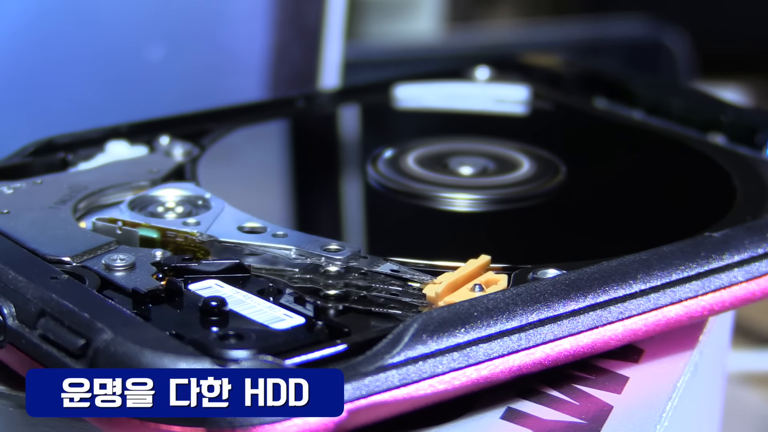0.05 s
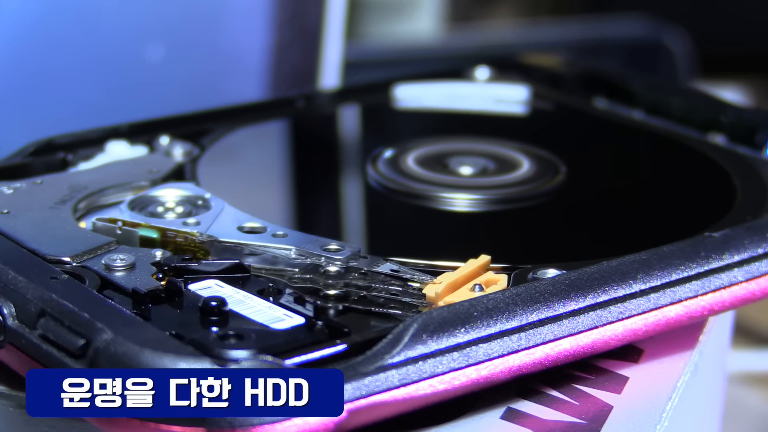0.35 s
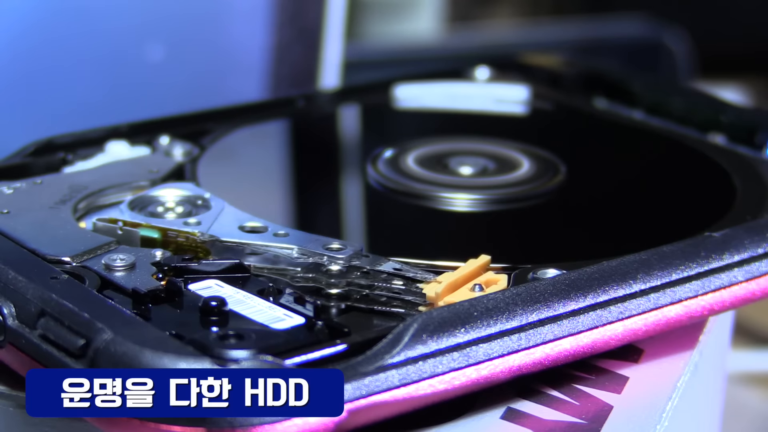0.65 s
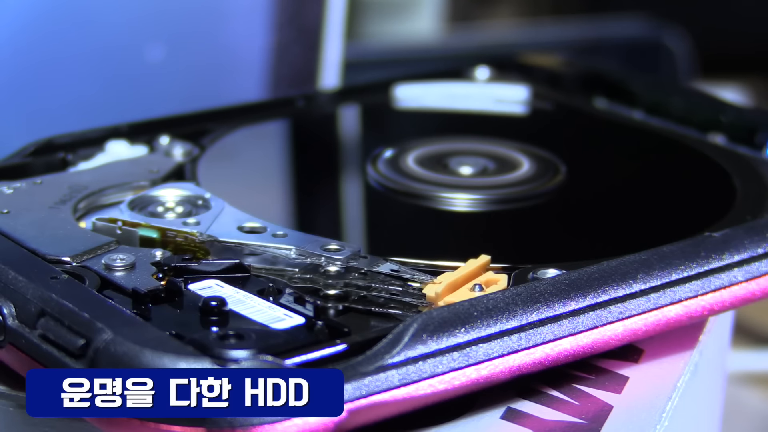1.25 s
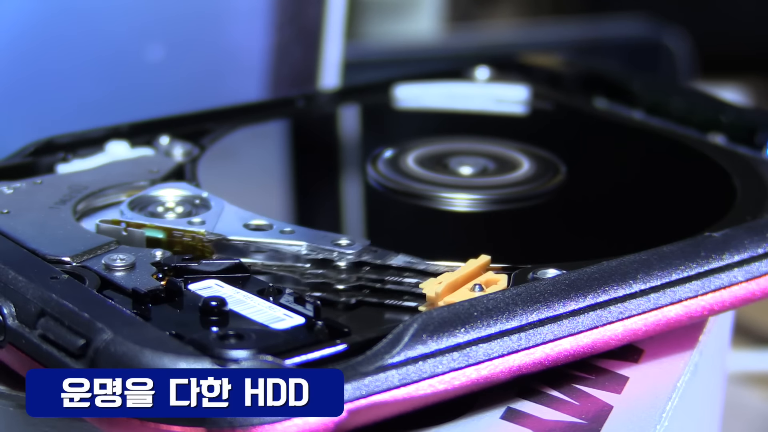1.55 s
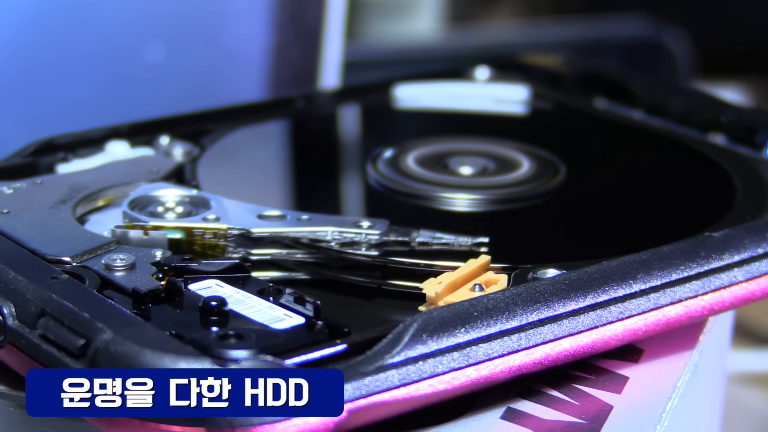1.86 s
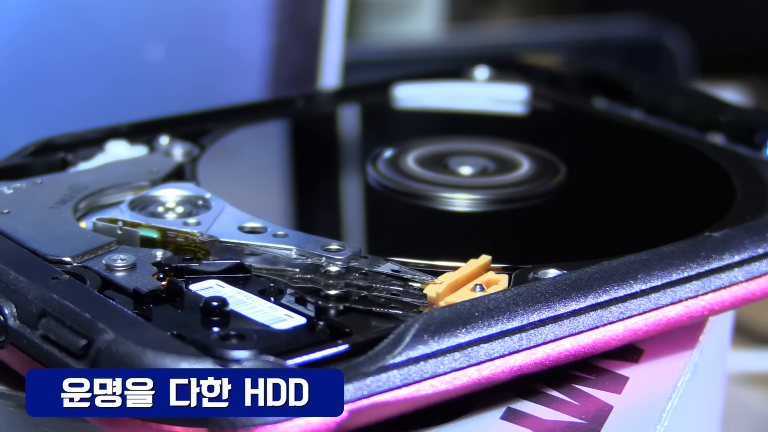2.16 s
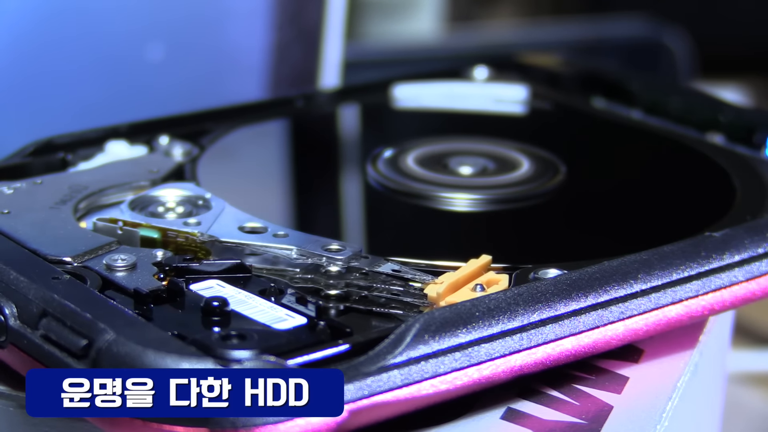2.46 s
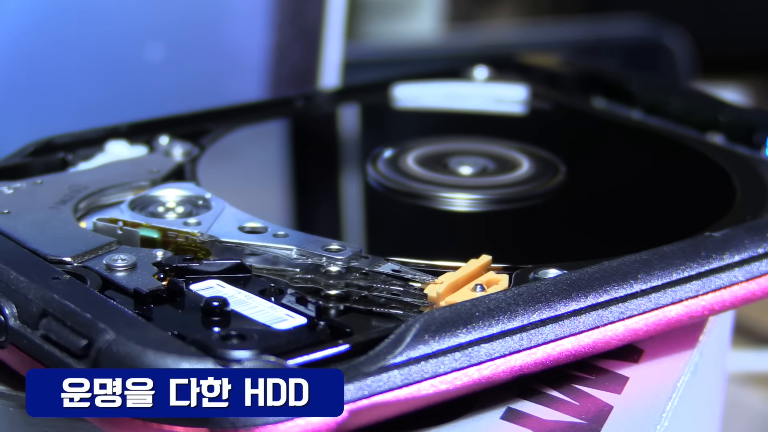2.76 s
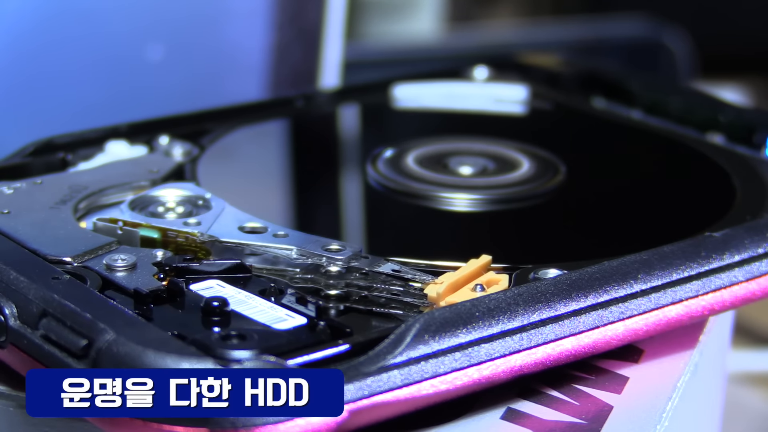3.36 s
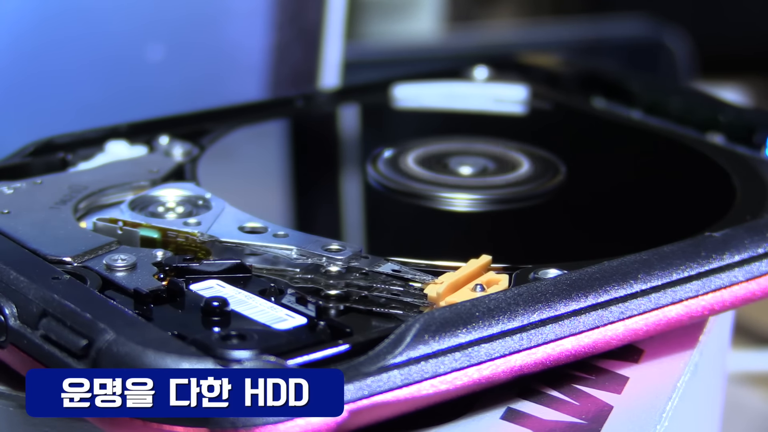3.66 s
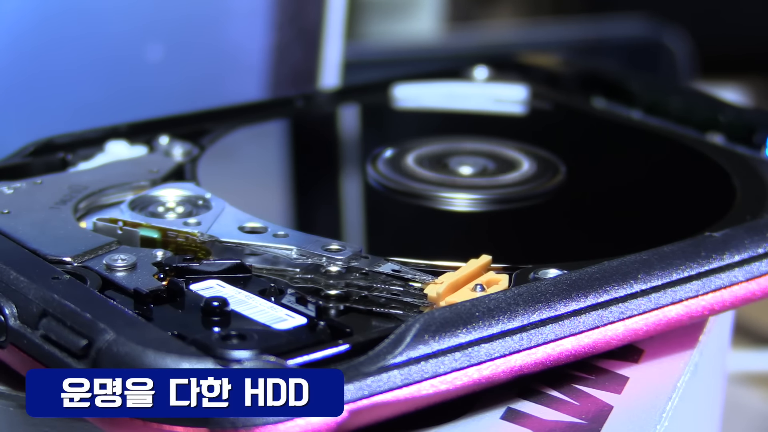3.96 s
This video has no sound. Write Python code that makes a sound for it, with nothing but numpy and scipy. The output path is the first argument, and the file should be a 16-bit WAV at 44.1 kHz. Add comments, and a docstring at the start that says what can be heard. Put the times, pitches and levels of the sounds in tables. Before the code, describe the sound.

A failing hard drive rubs with a high hiss, clacks three times, then winds down.

```python
"""Failing hard drive, opened

Close up, the heads rub on the spinning platter and the arm clacks three times against its stop.
The motor cuts out: the rubbing dulls and fades, and at low speed the heads catch on the same
rough spots at every turn. Thin squeaks and casing bumps lie over a quiet room with mains hum."""
import sys
import numpy as np
from scipy import signal
from scipy.fft import rfft, irfft
from scipy.io import wavfile

SR = 44100
rng = np.random.default_rng(int(sys.argv[2]) if len(sys.argv) > 2 else 0)


def wrap_up_sound(samples):
    """Save the sound to the file named by the first command line argument, as 16-bit audio."""
    columns = np.atleast_2d(samples).T
    # keep every value between -1 and 1, then stretch to whole-number steps
    tamed = np.clip(columns, -1, 1)
    steps = np.round(tamed * 32767).astype(np.int16)
    wavfile.write(sys.argv[1], SR, steps)


N = 176400
T = np.arange(N) / SR

# Platter speed. Each row: time in seconds, turns per second.
PLATTER_SPEED = [(0, 115.5), (2.2, 113.3), (2.45, 98), (2.75, 90), (2.87, 83), (3.16, 61.5), (3.35, 53),
                 (3.8, 43), (4, 29)]
# Head friction. Each row: time in seconds, force in dB.
RUB_FORCE = [(0, -27.5), (.52, -28), (.83, -25.5), (.95, -30), (1.19, -29.5), (1.32, -27.5), (1.7, -27),
             (1.84, -31.5), (2.05, -30), (2.075, -24.5), (2.28, -27), (2.55, -32.5), (2.84, -39),
             (3.06, -45.5), (3.28, -53.5), (3.48, -64), (4, -79)]
# Arm and platter under rubbing. Each row: centre in Hz, width in Hz, relative density in dB.
RUB_BANDS = [(465, 410, -24), (1134, 960, -22.5), (1890, 510, -9.5), (2277, 496, -6.5), (3120, 700, -12),
             (3576, 420, -4), (3815, 240, 0.5), (4170, 400, -2.5), (4515, 354, -0.5), (4935, 460, -5),
             (5586, 750, -11.5), (6550, 320, -9), (6960, 480, -12), (8030, 2000, -20), (10140, 1200, -19.5),
             (11760, 750, -20), (13200, 2000, -31.5), (15300, 900, -34.5)]
# Hum of the unbalanced platter. Each row: time in seconds, level in dB.
UNBALANCE_LEVEL = [(0, -55.5), (2.2, -56), (2.62, -55), (2.84, -42.5), (3.1, -45.5), (3.27, -43.5),
                   (3.36, -55.5), (4, -64)]
# Arm skids. Each row: start in seconds, length in seconds, force in dB, softness 0-1, rise in seconds.
ARM_SKIDS = [(.0082, 0.011, -18, 0, .001), (1.245, 0.0081, -11.5, 0.22, .002),
             (2.0794, 0.0083, -15, 0.13, .0006)]
# Arm knocks. Each row: start in seconds, force in dB, softness 0-1.
ARM_KNOCKS = [(.0092, -17, .6), (0.0111, -0.5, 0), (0.013, -21, .1), (0.0178, -17, .3), (0.769, -20.5, .05),
              (1.2287, -7, 1), (1.2479, 4, 0.37), (1.25, -4, 0.6), (1.2550, -9.5, .1), (1.600, -22.5, .05),
              (2.0650, -22, .3), (2.0821, -2, 0.17), (2.0829, -14, 0.4), (2.0850, 0.5, 0.8),
              (2.0887, -10, 0.2)]
# Modes of arm and stop. Each row: frequency in Hz, gain in dB, T60 in seconds.
ARM_STOP_MODES = [(1976, -28, 0.033), (2096, -21.5, 0.019), (2760, -28, 0.02), (3800, -25, .008),
                  (4580, -8.5, 0.0087), (5600, -16.5, 0.0098), (6470, -12, 0.0087), (7300, -20, 0.023),
                  (8060, -18.5, 0.019), (9830, -0.5, 0.0043), (10500, -9.5, .005), (11300, -14, .004),
                  (12000, -15, .005), (13300, -27, .004), (15300, -20, .004)]
# Rough spots on the platter. Each row: first catch in turns, relative force in dB.
ROUGH_SPOTS = [(0, 0), (1.62, -1.5), (2.43, -12), (2.2, -3.5)]
# Resonances of the dragging heads. Each row: centre in Hz, width in Hz, relative density in dB.
CATCH_BANDS = [(1460, 700, -17.5), (2380, 390, -8.5), (2860, 650, -17), (4045, 430, 1.5), (4660, 500, -5.5),
               (5470, 1100, -15), (6600, 270, -19), (7360, 300, -15.5), (8900, 800, -23),
               (11400, 3200, -28.5)]
# Low groan of the drag. Each row: centre in Hz, width in Hz, relative density in dB.
GROAN_BANDS = [(820, 340, 3.5), (110, 140, 5.5)]
# Head squeaks. Each row: start in seconds, length in seconds, pitch in Hz, level in dB.
HEAD_SQUEAKS = [(.385, 0.093, 8530, -41.5), (.385, .06, 14100, -55), (1.2, 0.011, 7250, -33),
                (2.038, 0.0081, 7200, -31.5), (2.648, .018, 13200, -58), (3.648, 0.015, 13200, -57),
                (3.643, .025, 5200, -56.5)]
# Casing bumps. Each row: start in seconds, level in dB, centre and width in Hz, T60 in seconds.
CASING_BUMPS = [(0.278, -34, 1300, 0.036), (0.718, -39, 800, 0.037), (0.724, -40, 127, .28),
                (1.359, -46, 150, 0.12), (2.46, -48.5, 180, .2)]
# Room noise spectrum. Each row: frequency in Hz, relative density in dB.
ROOM_SPECTRUM = [(20, -14), (40, -19), (70, 0), (130, -1.5), (200, -9.5), (290, -14.5), (360, -12.5),
                 (440, -15.5), (780, -13.5), (1100, -20), (2700, -27.5), (5000, -32.5), (8000, -34.5),
                 (13000, -38), (16000, -35)]
# Mains harmonics. Each row: frequency in Hz, level in dB.
MAINS_HARMONICS = [(60, -52), (120, -57.5), (240, -63)]

DULLING_DB_PER_OCTAVE, PIVOT_HZ = 6, 4000  # tilt per halving of speed
FLUTTER_DB, WOBBLE_DB = 0.32, 0.1
SKID_STOP_S, SOFT_HZ, ARM_HIGHPASS_HZ = .0012, 3500, 1730
CATCH_START_S, TURN_S, SLOWING_S = 3.7703, .028, .00046
CATCH_DB, CATCH_RISE_S, CATCH_FALL_S = -27.5, 0.00064, 0.0017
FIRST_CATCH_LOSS_DB, LOSS_RATIO_PER_TURN = 8, .15
DRAG_START_S, DRAG_DB, GROAN_DB = 3.775, -41.5, -42.5
WHINE_HZ, WHINE_WIDTH_HZ, WHINE_DB = 11270, 150, -74


def platter():
    """Head rub and unbalance hum; the rub dulls as the speed falls."""
    speed_hz = curve(PLATTER_SPEED)
    wobble = np.sin(2 * np.pi * np.cumsum(speed_hz) / SR)
    force = from_db(curve(RUB_FORCE) + FLUTTER_DB * drift(rate_hz=60) + WOBBLE_DB * wobble)
    rub = friction(RUB_BANDS, force, DULLING_DB_PER_OCTAVE * np.log2(speed_hz / speed_hz[0]))
    return rub + np.sqrt(2) * from_db(curve(UNBALANCE_LEVEL)) * wobble


def friction(bands, force, tilt_db_per_octave=0):
    """Friction noise, scaled by force, drives each resonance."""
    out, power = 0, 0
    for hz, width_hz, db in bands:
        gain = from_db(db + tilt_db_per_octave * np.log2(hz / PIVOT_HZ))
        out += gain * band(force * rng.standard_normal(N), hz, width_hz)
        power += from_db(db) ** 2 * 2 * width_hz / SR
    return out / np.sqrt(power)


def arm_clacks():
    """Knocks and gritty skids against the stop; the small arm radiates no bass."""
    force, grit = np.zeros(N), rng.standard_normal(N)
    grit /= np.std(arm_ring(grit))
    for start_s, db, softness in ARM_KNOCKS:
        hit = np.zeros(N)
        hit[int(start_s * SR)] = from_db(db)
        force += soft_contact(hit, softness)
    for start_s, length_s, db, softness, rise_s in ARM_SKIDS:
        ramps = np.minimum((T - start_s) / rise_s, (start_s + length_s - T) / SKID_STOP_S)
        force += soft_contact(from_db(db) * np.clip(ramps + .5, 0, 1) * grit, softness)
    highpass = signal.butter(3, ARM_HIGHPASS_HZ, "high", fs=SR, output="sos")
    return signal.sosfilt(highpass, arm_ring(force))


def arm_ring(force):
    """Arm and stop ring in damped modes."""
    out = 0
    for hz, db, t60_s in ARM_STOP_MODES:
        radius, angle = from_db(-60 / (t60_s * SR)), 2 * np.pi * hz / SR
        feedback = [1, -2 * radius * np.cos(angle), radius ** 2]
        out += from_db(db) * signal.lfilter([.5, 0, -.5], feedback, force + 1e-18)
    return out


def soft_contact(force, softness):
    """A soft contact loses treble and pushes longer."""
    pole = np.exp(-2 * np.pi * SOFT_HZ / SR)
    dull = signal.lfilter([2 * (1 - pole) ** 2], [1, -2 * pole, pole ** 2], force + 1e-18)
    return (1 - softness) * force + softness * dull


def head_catches():
    """Heads strike each rough spot once a turn, weakly at first, over a growing drag."""
    force = np.zeros(N)
    for first_turn, db in ROUGH_SPOTS:
        for repeat in range(8):
            turn = first_turn + repeat
            age_s = T - (CATCH_START_S + TURN_S * turn + SLOWING_S * turn ** 2)
            exponent = np.where(age_s < 0, (age_s / CATCH_RISE_S) ** 2, age_s / CATCH_FALL_S)
            loss_db = FIRST_CATCH_LOSS_DB * LOSS_RATIO_PER_TURN ** repeat
            force += from_db(CATCH_DB + db - loss_db) * np.exp(-np.minimum(exponent, 20))
    drag = curve([(DRAG_START_S, 0), (T[-1], 1)])
    scrape = friction(CATCH_BANDS, force + from_db(DRAG_DB) * drag)
    return scrape + friction(GROAN_BANDS, from_db(GROAN_DB) * drag)


def head_squeaks(rise_hz_per_s=2200, waver_ratio=.022):
    """Short wavering tones that rise a little."""
    out = np.zeros(N)
    for start_s, length_s, hz, db in HEAD_SQUEAKS:
        age_s = T - start_s
        glide_hz = rise_hz_per_s * np.clip(age_s - length_s / 2, -length_s, length_s)
        pitch_hz = hz * (1 + waver_ratio * drift(rate_hz=640)) + glide_hz
        swell = np.sqrt(np.abs(np.sin(np.pi * np.clip(age_s / length_s, 0, 1))))
        out += from_db(db) * swell * np.sin(2 * np.pi * np.cumsum(pitch_hz) / SR)
    return out


def casing_bumps():
    """Soft, quickly dying thuds of the casing."""
    out = np.zeros(N)
    for start_s, db, hz, t60_s in CASING_BUMPS:
        fade = from_db(db - 60 * np.maximum(T - start_s, 0) / t60_s) * (T > start_s)
        out += fade * unit_rms(band(rng.standard_normal(N), hz, hz))
    return out


def room_echo(x, gain_db=-18, t60_s=.16):
    """Short diffuse tail from desk and walls."""
    age_s = T[:SR // 2]
    tail = rng.standard_normal(len(age_s)) * from_db(-60 * age_s / t60_s) * (age_s > .003)
    return from_db(gain_db) * signal.fftconvolve(x, tail / np.linalg.norm(tail))[:N]


def room_tone(noise_db=-47.5, hum_waver_db=1.5):
    """Low steady noise, wavering mains hum and a faint electrical whine."""
    points_hz, points_db = np.transpose(ROOM_SPECTRUM)
    colour = from_db(np.interp(np.log(np.fft.rfftfreq(N, 1 / SR) + 1), np.log(points_hz), points_db))
    noise = from_db(noise_db) * unit_rms(irfft(rfft(rng.standard_normal(N)) * colour, N))
    hum = 0
    for hz, db in MAINS_HARMONICS:
        amplitude = np.sqrt(2) * from_db(db + hum_waver_db * drift(rate_hz=4.6))
        hum += amplitude * np.sin(2 * np.pi * (hz * T + rng.random()))
    whine = from_db(WHINE_DB) * unit_rms(band(rng.standard_normal(N), WHINE_HZ, WHINE_WIDTH_HZ))
    return noise + hum + whine


def from_db(db):
    """Decibels to gain."""
    return 10 ** (np.asarray(db) / 20)


def unit_rms(x):
    """Scale to rms 1."""
    return x / np.sqrt(np.mean(x ** 2) + 1e-20)


def curve(rows):
    """Join (seconds, value) rows by straight lines."""
    return np.interp(T, *np.transpose(rows))


def band(x, hz, width_hz):
    """One broad resonance with steep skirts."""
    low_hz = np.sqrt(hz ** 2 + width_hz ** 2 / 4) - width_hz / 2
    edges_hz = np.clip([low_hz, low_hz + width_hz], 10, .48 * SR)
    return signal.sosfilt(signal.butter(2, edges_hz, "band", fs=SR, output="sos"), x + 1e-18)


def drift(rate_hz):
    """Smooth random motion, rms 1."""
    lowpass = signal.butter(2, rate_hz, fs=SR, output="sos")
    return unit_rms(signal.sosfilt(lowpass, rng.standard_normal(N)))


def scene():
    """Drive and room, mono."""
    clacks = arm_clacks()
    mix = platter() + clacks + room_echo(clacks) + head_catches() + head_squeaks() + casing_bumps()
    return (mix + room_tone())[None]


def record(dry):
    """Round the highest peaks, cut the top."""
    ceiling, cutoff_hz = 1.2, 15900
    lowpass = signal.ellip(12, .1, 80, cutoff_hz, fs=SR, output="sos")
    return signal.sosfilt(lowpass, ceiling * np.tanh(dry / ceiling))


dry = scene()
out = record(dry)
wrap_up_sound(out)
```